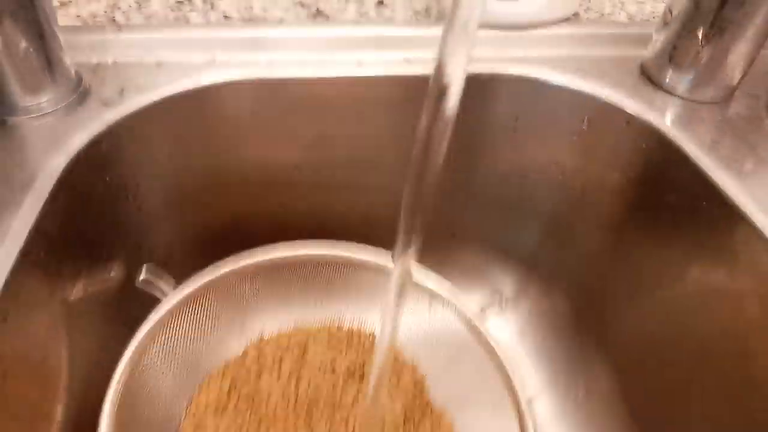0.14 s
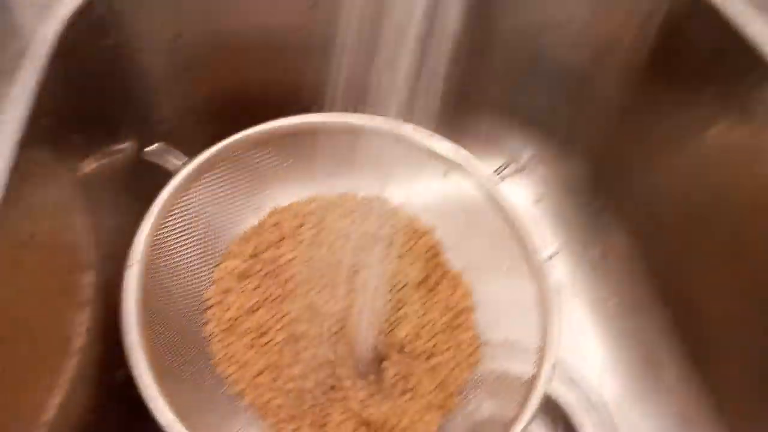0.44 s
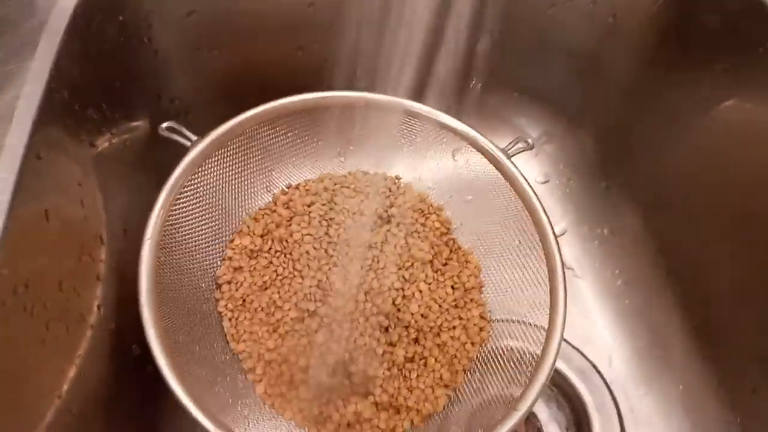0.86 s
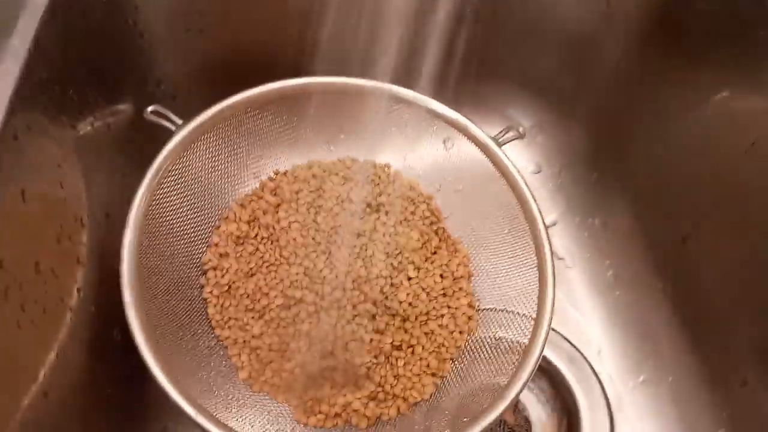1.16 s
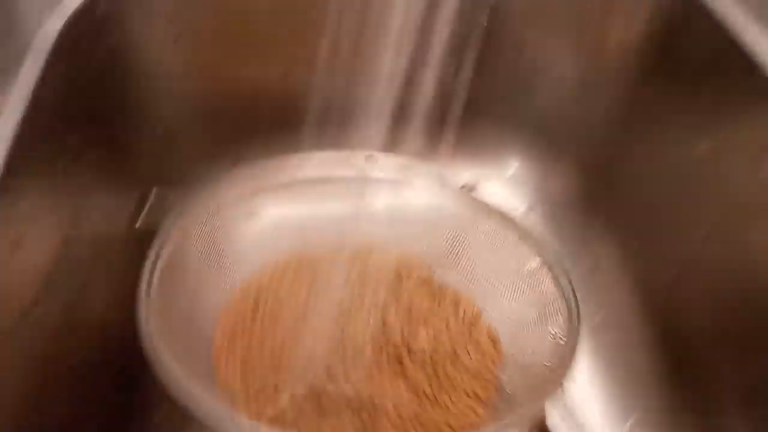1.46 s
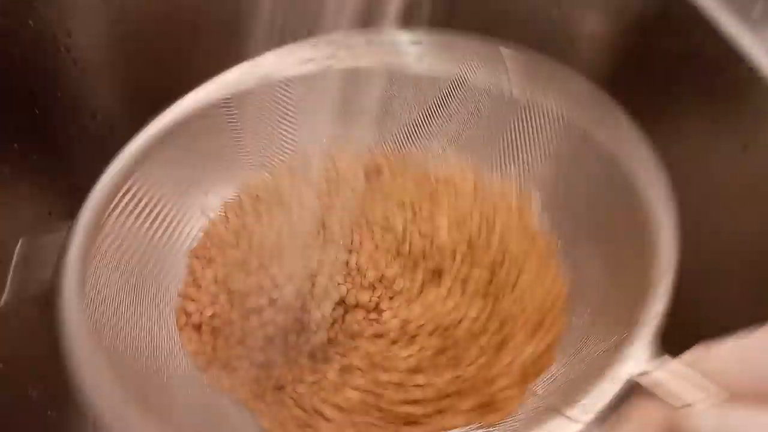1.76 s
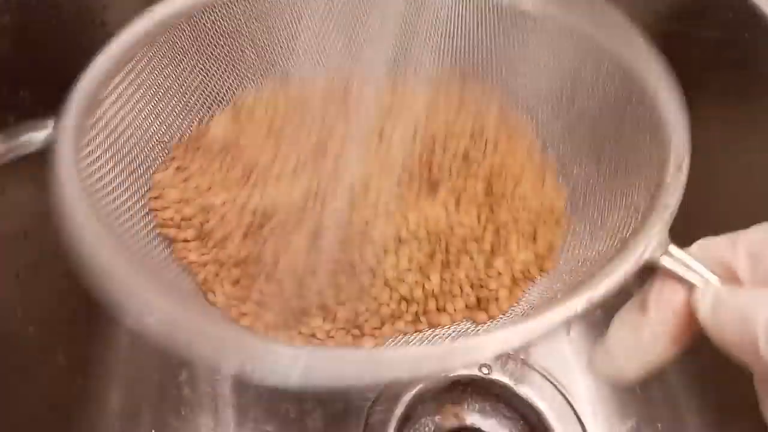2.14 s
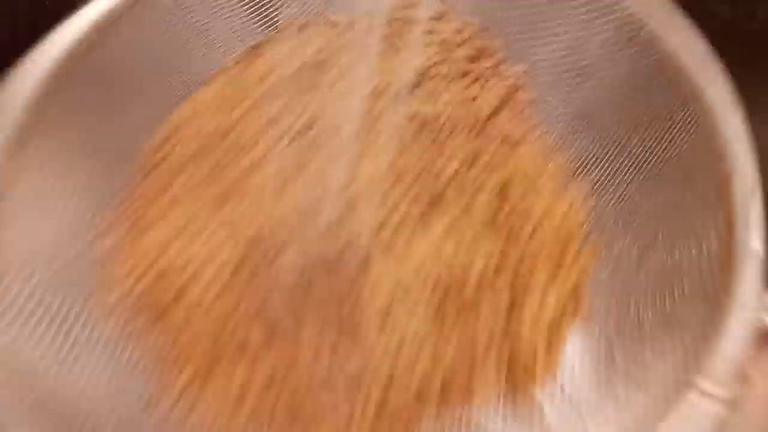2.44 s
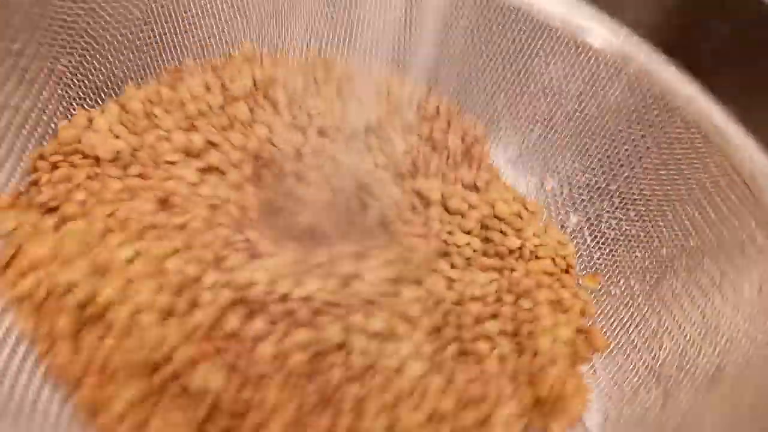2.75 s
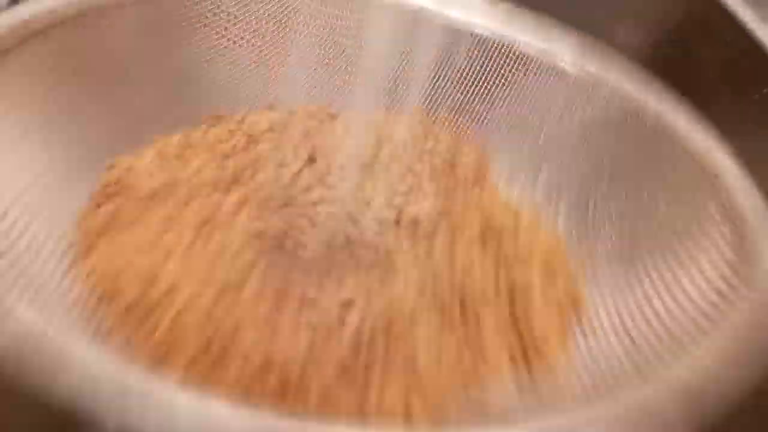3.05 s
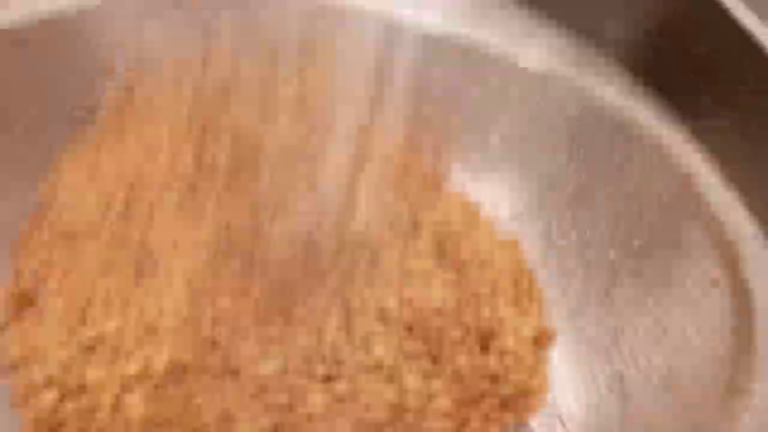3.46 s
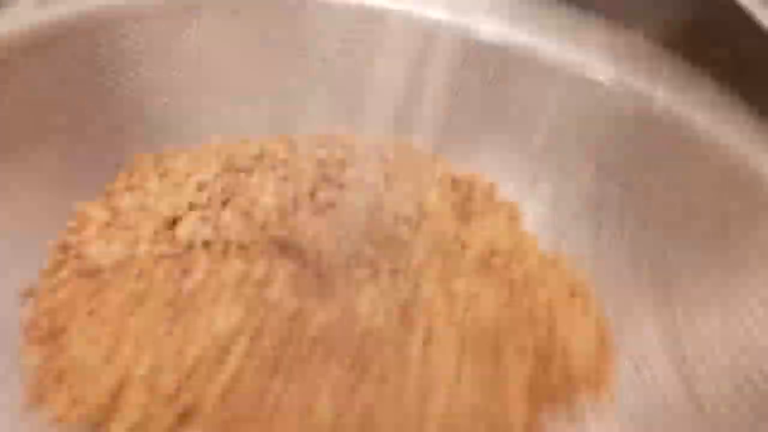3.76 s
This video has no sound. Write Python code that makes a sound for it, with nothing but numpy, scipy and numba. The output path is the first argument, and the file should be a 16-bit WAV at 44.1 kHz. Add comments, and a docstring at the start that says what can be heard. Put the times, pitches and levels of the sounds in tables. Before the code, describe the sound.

Tap water rinses lentils in a metal strainer: a split-second thin trickle, an abrupt jump to full hissing spray, a faint scrape and small metallic knocks, low motor hum beneath; close stereo phone in a steel sink.

```python
"""A steel kitchen sink: tap water rinses lentils in a wire strainer, close to a phone with two microphone
ports. After a thin trickle, a cut leads abruptly to a full spray: noise hiss, droplet clicks and gliding bubble
sines. Single bubbles ring out as longer sines; the strainer scrapes and knocks the sink, driving its decaying
modes. A motor outside drones as a stack of sines over low rumble, its strongest line beating with the mains."""
import sys
import numpy as np
from scipy import signal
from scipy.fft import rfft, irfft
from scipy.io import wavfile
from scipy.ndimage import uniform_filter1d
from numba import njit

SR = 44100
rng = np.random.default_rng(int(sys.argv[2]) if len(sys.argv) > 2 else 0)


def ratio(d):
    """dB to gain"""
    e = np.asarray(d, float) / 20
    return 10 ** e


def master_out(mix):
    """Clip the mix to full scale and print it as 16-bit PCM to the path in sys.argv[1]."""
    frames = np.transpose(np.atleast_2d(mix))
    ceiling = np.clip(frames, -1, 1)
    pcm = np.round(ceiling * 32767).astype(np.int16)
    wavfile.write(sys.argv[1], SR, pcm)


N = 171990

# thin stream before the spray, ahead of each port's gain: t/s, level/dB
TRICKLE_LEVEL = [(0, -30.5), (.02, -32), (.06, -38.5), (.165, -35), (.183, -33.5), (.19, -48)]
# colour of the thin stream, ahead of each port's response: f/Hz, level/dB per Hz
TRICKLE_COLOUR = [(150, -15), (400, 2.5), (2850, -3), (3100, 2), (3400, -6), (7300, -14), (8300, -11),
                  (9200, -14), (15000, -17)]
TICKS_PER_S = 120  # single drops in the thin stream

# motor lines, ahead of the drone level: multiple of the motor's turning rate, rms level/dB
MOTOR_LINES = [(4, -60.5), (6, -55), (7, -54.5), (8, -52.5), (12, -45), (15, -53), (16, -57), (20, -58.5)]
MOTOR_HZ = 12.7
# the mains line sits BEAT_HZ below the strongest motor line, in phase with it at IN_STEP_S
BEAT_HZ, MAINS_DB, IN_STEP_S = 2.657, -49.5, 1.87
# spectrum of the low rumble: f/Hz, level/dB per Hz
RUMBLE_COLOUR = [(35, -28), (76, -2), (150, -0.5), (240, -20), (400, -10), (600, -45)]
RUMBLE_DB, OWN_RUMBLE_DB = -46.5, -13  # rms ahead of the drone level; each port's own against the common one
# level of drone and rumble together, louder before the cut: t/s, level/dB
DRONE_LEVEL = [(0, 8.5), (.16, 10), (.19, -3.5), (3.9, -0.5)]
DRONE_PAN_DB = 2.5  # left minus right

# single loud bubbles and drips, before panning: t/s, level/dB, f/Hz, cycles to fall by 20 dB
PLOPS = [(0.016, -24, 3150, 25), (0.1649, -18.5, 3100, 30), (0.344, -17.5, 3070, 40), (0.35, -17, 3500, 11),
         (1.881, -8, 4700, 3.3)]

# a cut from the thin stream to the full spray, with a short burst and gap at the join: t/s, level/dB
SPRAY_JOIN = [(.182, -38), (.186, 8), (.191, 2), (.198, -8), (.212, -0.5)]
# loudness of the spray: t/s, level/dB
SPRAY_FLOW = [(.21, -0.5), (.31, -3), (.35, 1), (.4, -1), (1.03, -0.5), (1.09, -4), (1.14, -1), (1.45, 0.5),
              (1.67, -2), (1.81, -1.5), (1.87, -0.5), (1.93, -2), (2.06, 0.5), (2.4, -2), (2.68, -0.5),
              (2.8, -3.5), (2.95, 0), (3.09, -3.5), (3.14, 2.5), (3.2, -1.5), (3.25, 2.5), (3.32, -1),
              (3.56, -1.5), (3.62, 1.5), (3.72, -1.5), (3.85, 0)]
# colour against that loudness: t/s, low level/dB, middle level/dB, treble left minus right/dB
SPRAY_COLOUR = [(.21, 3, -10, 4), (.33, -1.5, 0, 3), (1.2, 1, -2.5, 2), (1.6, -4.5, 0.5, 1.5),
                (2.0, 1.5, 2, 2), (2.4, -2, 0, -0.5), (2.7, 1.5, 4.5, 0.5), (3.05, -2.5, 4, 1),
                (3.3, 0, 2.5, 0), (3.9, -4, 1, 1.5)]
# centres of the low, middle and top colour regions: f/Hz
COLOUR_HZ = [800, 2500, 6000]
# spray as the left port hears it: f/Hz, level/dB
LEFT_PORT = [(280, -7.5), (560, -21), (1300, -13.5), (2000, -9.5), (3000, -6.5), (4000, -6), (5000, -8),
             (5900, -3.5), (6600, -0.5), (7500, -1), (8500, -3.5), (9500, -7), (10500, -16), (12000, -14),
             (13700, -29.5), (14600, -4.5), (15700, -6)]
# spray as the right port hears it: f/Hz, level/dB
RIGHT_PORT = [(280, -11), (560, -21), (1300, -13), (2000, -15), (3000, -8.5), (4000, -7.5), (5000, -4),
              (5900, -8), (6600, 0.5), (7300, -12), (8200, -8), (9300, -8.5), (10300, -1), (11500, 1),
              (12500, -3.5), (13700, -6), (14600, 1)]
LEFT_SPRAY_DB, RIGHT_SPRAY_DB = -22, -21  # rms over the whole scene
# share of the direct spray's power common to both ports: f/Hz, share/0-1
SHARED = [(1000, 0.83), (3000, 0.42), (15000, 0)]
# the strainer is lifted towards the phone, so more of the spray arrives directly: t/s, direct share/0-1
DIRECT = [(1.4, 0.25), (2.4, 0.96)]
LEFT_LATE_S = 0.001117  # common sound reaches the left port later
DROPS_PER_S, DROP_SPREAD_DB, DROPS_DB = 5000, 2.5, -8  # last: drops against hiss
BUBBLES_PER_S, BUBBLE_LOW_HZ, BUBBLE_HIGH_HZ = 500, 494, 6960
BUBBLE_SPREAD_DB, BUBBLES_DB = 4.5, -10.5  # last: bubbles against hiss
SPATTER_PER_S, SPATTER_T60_S, SPATTER_DEPTH = 600, 0.0068, 0.4
ECHO_S, ECHO_DRIFT_S = (0.001295, 0.0022, 0.0037), 0.00021
ECHO_DB, ECHO_TOP_HZ = -13, 5060

# modes of the sink bowl: f/Hz, relative level/dB, 60 dB decay/s
SINK_MODES = [(327.4, 8, .18), (586, 7.5, 0.12), (700, 0, 0.28), (1390, 20, 0.031), (1510, 15, 0.034),
              (2580, 12, .03)]
# strainer scraping the sink; the level is rms over its span
SCRAPE_START_S, SCRAPE_END_S, SCRAPE_DB, SCRAPE_LEFT_LATE_S = 1.338, 1.465, -38, 0.0003
SCRAPE_UPPER_DB = 0.5  # upper two modes against the lowest
# strainer knocks on the sink: t/s, relative level/dB, brightness/0-1
KNOCKS = [(2.077, -27.5, 0.7), (2.097, -36.5, 0.74), (2.691, -37.5, 0.78), (2.97, -36.5, 0.36),
          (3.199, -38, 0.16), (3.694, -39.5, 0)]
# spectrum of the knocks' clatter: f/Hz, level/dB
CLATTER_COLOUR = [(150, -28), (400, 6), (900, 1), (2600, 4.5), (6000, -14)]
CLATTER_DB, CLATTER_T60_S = 5, 0.12  # level against the knock at full brightness

TOP_HZ = 15800  # top of the phone's range


def col(table, index, at, log=False):
    """Read a table column at given places, on a straight or logarithmic axis."""
    table = np.array(table, float)
    if log:
        return np.interp(np.log(at), np.log(table[:, 0]), table[:, index])
    return np.interp(at, table[:, 0], table[:, index])


def unit(x):
    """Scale to rms 1."""
    return x / np.sqrt(np.mean(x ** 2))


def colour(x, table):
    """Filter by a spectrum of f/Hz, level/dB."""
    hz = np.arange(N // 2 + 1) * SR / N + 1
    return irfft(rfft(x) * ratio(col(table, 1, hz, True)), N)


def walk(rate):
    """Random levels held 1 / rate s and slewed twice, for natural wavering."""
    k = int(SR / rate)
    held = np.repeat(rng.standard_normal(N // k + 1), k)
    return 0.96 * uniform_filter1d(uniform_filter1d(held, k), k)[:N]


@njit
def grains(n, sr, start, hz, t60, size, glide):
    """Decaying sines, each rising by the fraction glide of its pitch as it dies away."""
    out = np.zeros(n)
    for k in range(len(start)):
        first, length = int(start[k] * sr), int(t60[k] * sr) + 1
        step = np.exp(2j * np.pi * hz[k] / sr - np.log(1000) / length)
        bend = np.exp(2j * np.pi * hz[k] * glide / sr / length)
        z = size[k] + 0j
        for j in range(first, min(n, first + length)):
            out[j] += z.imag
            z *= step
            step *= bend
    return out


def tail(x, t60):
    """Let each impulse die away by 60 dB in t60 s."""
    return signal.lfilter([1], [1, -np.exp(-np.log(1000) / (t60 * SR))], x)


def to_ports(x, pan_db):
    """One source at both ports, later at the left."""
    left = np.roll(x, int(LEFT_LATE_S * SR)) * ratio(pan_db / 2)
    return np.array([left, x * ratio(-pan_db / 2)])


def spatter(per_s=SPATTER_PER_S):
    """Sudden small bursts of droplets that die away fast."""
    hit = rng.random(N) < per_s / SR
    return tail(hit * np.minimum(rng.exponential(size=N), 2.5), SPATTER_T60_S)


def splashes():
    """Water's raw material: steady hiss, droplet impulses and bubbles ringing upwards in pitch."""
    hit = rng.random(N) < DROPS_PER_S / SR
    drop_size = ratio(DROP_SPREAD_DB * np.minimum(rng.exponential(size=N), 3))
    drops = hit * rng.standard_normal(N) * drop_size
    when, pitch, ring, loudness = rng.random((int(BUBBLES_PER_S * N / SR), 4)).T
    hz = BUBBLE_LOW_HZ + (BUBBLE_HIGH_HZ - BUBBLE_LOW_HZ) * pitch
    t60 = (10 + 60 * ring) / hz
    # longer rings start softer, which evens out their energy
    size = ratio(-BUBBLE_SPREAD_DB * np.log(1.03 - loudness)) / np.sqrt(t60)
    bubbles = grains(N, 1. * SR, when * N / SR, hz, t60, size, 0.16)
    return rng.standard_normal(N) + ratio(DROPS_DB) * unit(drops) + ratio(BUBBLES_DB) * unit(bubbles)


def trickle():
    """A thin stream: splashes made duller, with a ring near 3 kHz and single drops ticking through."""
    level_db = col(TRICKLE_LEVEL, 1, np.arange(N) / SR) + 2.4 * walk(65)
    level = ratio(level_db) * (1 + 1.4 * spatter(per_s=TICKS_PER_S))
    sides = []
    for port, db in ((LEFT_PORT, 4), (RIGHT_PORT, 1)):
        water = colour(colour(splashes(), TRICKLE_COLOUR), port)
        sides.append(unit(water) * level * ratio(db))
    return np.array(sides)


def rumble():
    """Random noise shaped into low rumble."""
    return ratio(RUMBLE_DB) * unit(colour(rng.standard_normal(N), RUMBLE_COLOUR))


def drone():
    """Wavering motor lines, a mains line beating with the strongest, and rumble partly different at each port."""
    t = np.arange(N) / SR
    from_step = t - IN_STEP_S
    phases = rng.uniform(0, 2 * np.pi, len(MOTOR_LINES))
    hum = 0
    for (multiple, db), phase in zip(MOTOR_LINES, phases):
        line = np.sin(2 * np.pi * multiple * MOTOR_HZ * from_step + phase)
        hum = hum + ratio(db + 0.94 * walk(5.34)) * line
    strongest = 4  # row of the motor table
    mains_hz = MOTOR_LINES[strongest][0] * MOTOR_HZ - BEAT_HZ
    hum = hum + ratio(MAINS_DB) * np.sin(2 * np.pi * mains_hz * from_step + phases[strongest])
    common = to_ports(np.sqrt(2) * hum + rumble(), DRONE_PAN_DB)  # sqrt(2) turns rms into peak
    own = ratio(OWN_RUMBLE_DB) * np.array([rumble(), rumble()])
    return (common + own) * ratio(col(DRONE_LEVEL, 1, t))


def plops():
    """Single bubbles: decaying sines with a slight upward glide, ringing above the water."""
    start, db, hz, cycles = np.array(PLOPS, float).T
    return grains(N, 1. * SR, start, hz, 3 * cycles / hz, ratio(db), 0.039)


def bowl(x):
    """The steel walls send short, dull echoes whose delays drift as the strainer moves."""
    at = np.arange(N)
    dull = signal.lfilter(*signal.butter(1, ECHO_TOP_HZ, fs=SR), x)
    echoes = sum(np.interp(at - SR * (s + ECHO_DRIFT_S * walk(3)), at, dull) for s in ECHO_S)
    return x + ratio(ECHO_DB) * echoes


def spray_at_ports(octave):
    """Splashes at both ports: direct sound shares low frequencies, scattered sound shares none."""
    both, left, right = (rfft(splashes()) for _ in range(3))
    share = np.clip(col(SHARED, 1, 2 ** octave, True), 0, 1)
    late = np.exp(-2j * np.pi * 2 ** octave * LEFT_LATE_S)
    near = irfft(np.array([np.sqrt(share) * both * late + np.sqrt(1 - share) * left,
                           np.sqrt(share) * both + np.sqrt(1 - share) * right]), N)
    # shifted by half the length, so it does not line up with the direct sound
    scattered = np.roll(irfft(np.array([left, right]), N), N // 2, axis=1)
    direct = np.clip(col(DIRECT, 1, np.arange(N) / SR), 0, 1)
    return rfft(np.sqrt(direct) * near + np.sqrt(1 - direct) * scattered)


def spray():
    """Half-octave bands of splashes follow the flow, spatter together and flicker alone, then echo in the bowl."""
    t = np.arange(N) / SR
    octave = np.log2(np.arange(N // 2 + 1) * SR / N + 1)
    water = spray_at_ports(octave)
    regions = np.array([col(SPRAY_COLOUR, 1, t), col(SPRAY_COLOUR, 2, t), 0 * t])
    pan = col(SPRAY_COLOUR, 3, t)
    shower = spatter()
    flow = col(SPRAY_FLOW, 1, t) + col(SPRAY_JOIN, 1, t)
    out, near = 0, walk(26.0)
    for hz in 180 * 2 ** np.arange(0, 7, .5):
        place = np.interp(np.log(hz), np.log(COLOUR_HZ), np.arange(3))
        lo = min(int(place), 1)
        tint = regions[lo] + (place - lo) * (regions[lo + 1] - regions[lo])
        # neighbouring bands have one slow walk in common
        last, near = near, walk(24.885)
        flicker = 0.76 * (last + near) + 1.1 * walk(70) + 0.95 * walk(9.01)
        window = np.cos(np.clip((octave - np.log2(hz)) * 2, -1, 1) * np.pi / 2) ** 2
        band = irfft(water * window, N)
        # spatter and panning both grow towards the treble
        bursts = 1 + SPATTER_DEPTH * min(hz / 9900.0, 1) * (shower + 0.65 * spatter())
        side_db = min(hz / 5200.0, 1) * np.array([pan, -pan]) / 2
        out = out + band * bursts * ratio(flow + tint + flicker + side_db)
    left = unit(colour(bowl(out[0]), LEFT_PORT)) * ratio(LEFT_SPRAY_DB)
    right = unit(colour(bowl(out[1]), RIGHT_PORT)) * ratio(RIGHT_SPRAY_DB)
    return np.array([left, right])


def scrape():
    """Jerky rubbing drives three of the sink's modes; the lowest rings on."""
    t = np.arange(N) / SR
    span = SCRAPE_END_S - SCRAPE_START_S
    swell = np.sin(np.pi * np.clip((t - SCRAPE_START_S) / span, 0, 1)) ** .5
    drive = rng.standard_normal(N) * ratio(1.9 * walk(59.8)) * swell
    rung = []
    for hz, _, t60 in SINK_MODES[2:5]:
        ring = np.sin(2 * np.pi * hz * t[:SR]) * np.exp(-np.log(1000) * t[:SR] / t60)
        rung.append(unit(signal.fftconvolve(drive, ring)[:N]))
    mix = rung[0] + ratio(SCRAPE_UPPER_DB) * (rung[1] + rung[2])
    mix = mix / np.sqrt(np.sum(mix ** 2) / SR / span) * ratio(SCRAPE_DB)
    return np.array([np.roll(mix, int(SCRAPE_LEFT_LATE_S * SR)), mix])


def knocks():
    """Each knock rings the sink's modes, the upper ones more when bright, under a short clatter."""
    start, db, bright = np.array(KNOCKS, float).T
    hz, mode_db, t60 = np.array(SINK_MODES, float).T
    # one row per knock, one column per mode
    tilt = 12.2 * (bright[:, None] - 1.0) * np.log2(hz / 600)
    size = ratio(db[:, None] - 13 + mode_db + tilt)
    starts = np.repeat(start, len(hz))
    ring = grains(N, 1. * SR, starts, np.tile(hz, len(start)), np.tile(t60, len(start)), size.ravel(), 0.)
    blows = np.zeros(N)
    blows[(start * SR).astype(int)] = ratio(db + CLATTER_DB + 28 * (bright - 1.0))
    rattle = unit(colour(rng.standard_normal(N) * ratio(2 * walk(300)), CLATTER_COLOUR))
    return ring + rattle * (tail(blows, CLATTER_T60_S) + 2 * tail(blows, 0.03))


def scene():
    """Trickle, drone, single drips, spray, scrape and knocks, summed at the two ports."""
    water = trickle() + to_ports(plops(), 7.4) + spray()
    strainer = scrape() + to_ports(knocks(), 5.5)
    return water + strainer + drone()


def top_cut(x):
    """Nothing passes above the cut-off."""
    return signal.sosfilt(signal.butter(12, 16850, fs=SR, output="sos"), x)


def record(dry):
    """The phone cuts the top steeply and the lowest bass gently."""
    x = signal.sosfilt(signal.ellip(12, .3, 80, TOP_HZ, fs=SR, output="sos"), dry)
    x = signal.sosfilt(signal.butter(2, 45, "high", fs=SR, output="sos"), x)
    return top_cut(x)


dry = scene()
out = record(dry)
master_out(out)
```